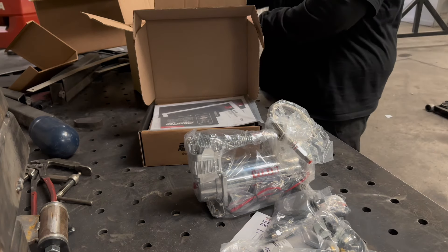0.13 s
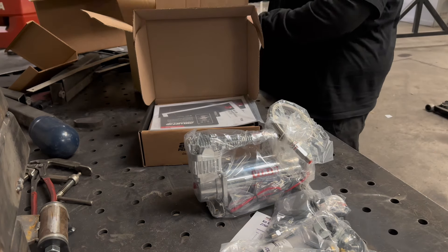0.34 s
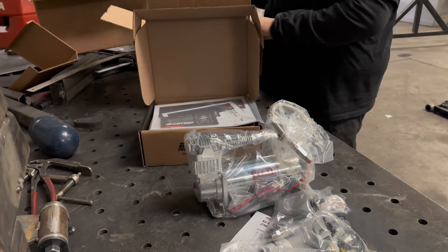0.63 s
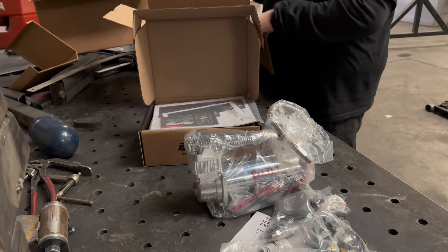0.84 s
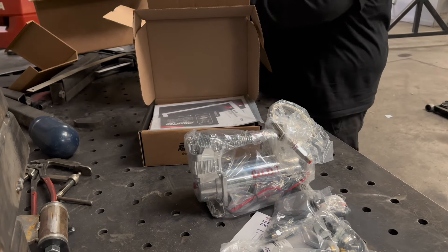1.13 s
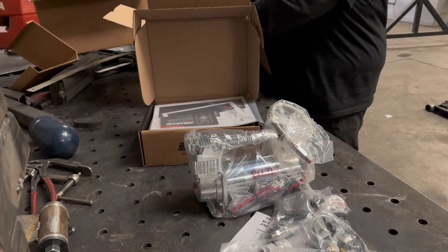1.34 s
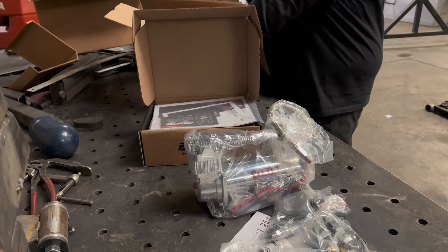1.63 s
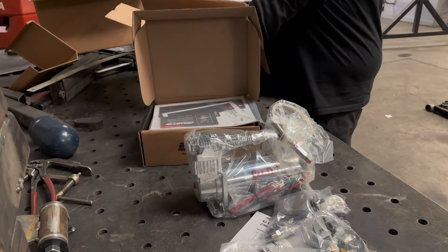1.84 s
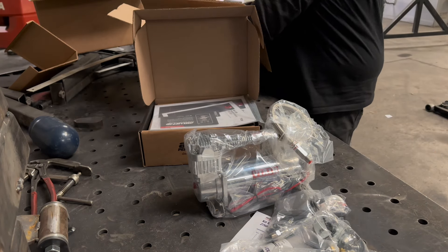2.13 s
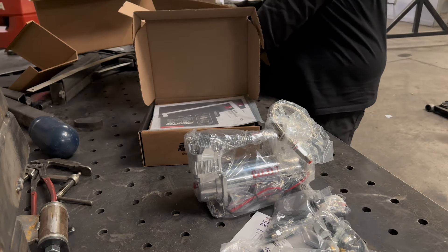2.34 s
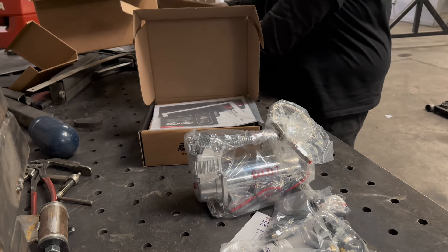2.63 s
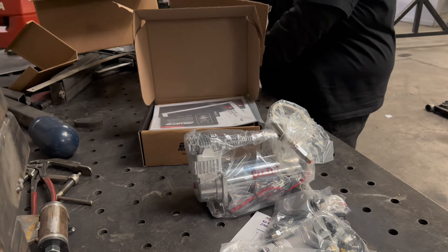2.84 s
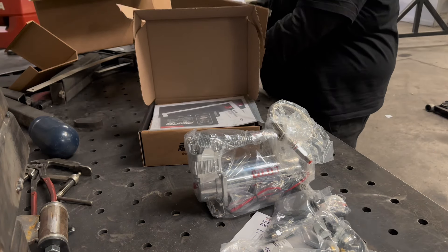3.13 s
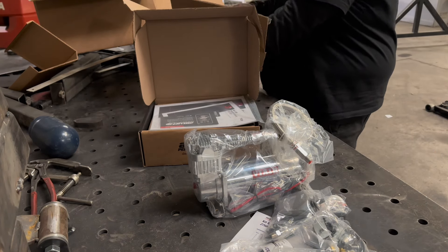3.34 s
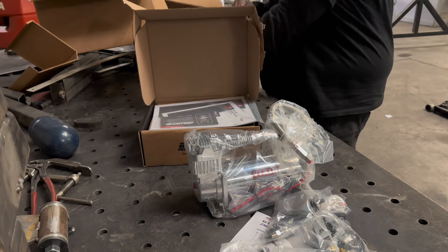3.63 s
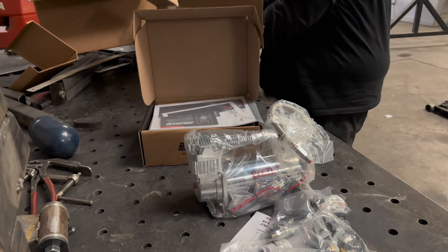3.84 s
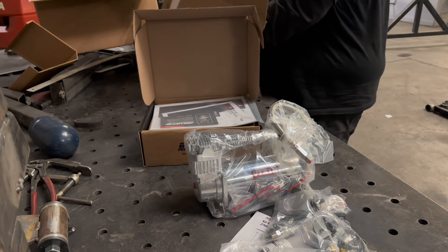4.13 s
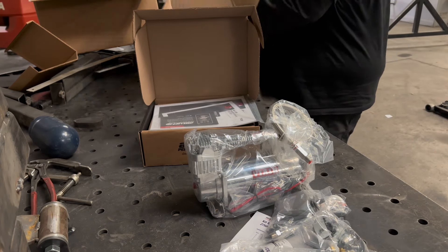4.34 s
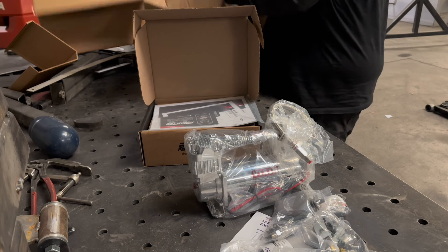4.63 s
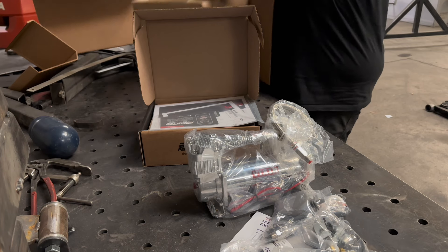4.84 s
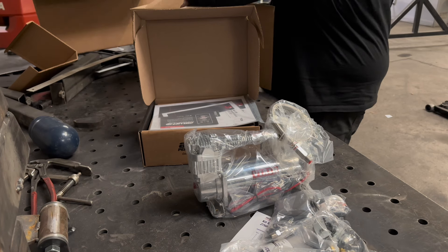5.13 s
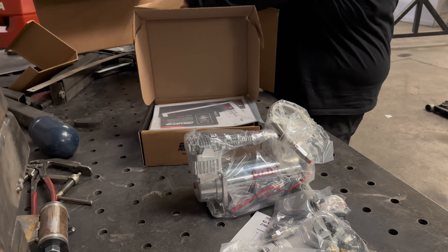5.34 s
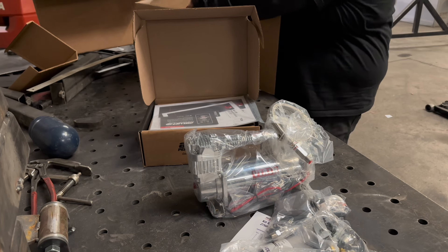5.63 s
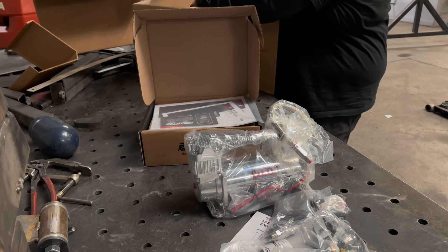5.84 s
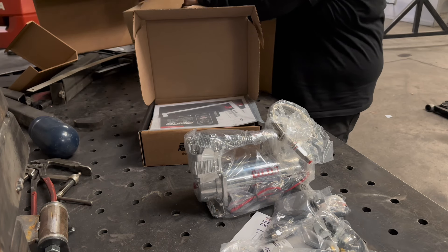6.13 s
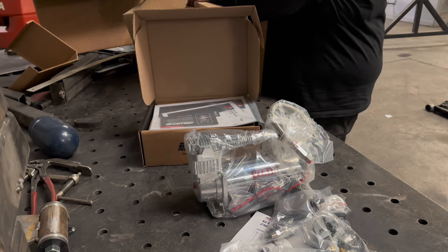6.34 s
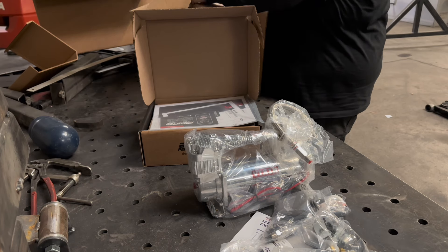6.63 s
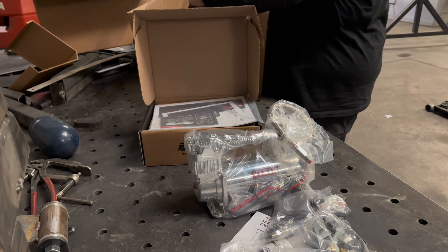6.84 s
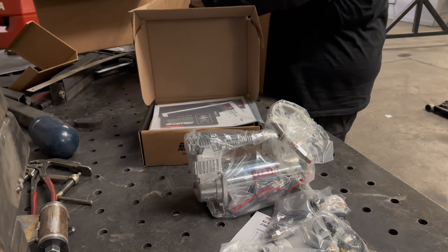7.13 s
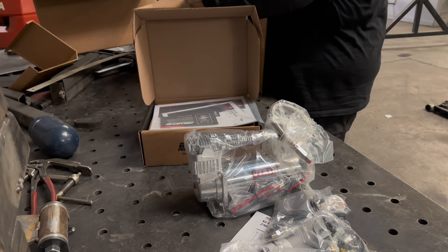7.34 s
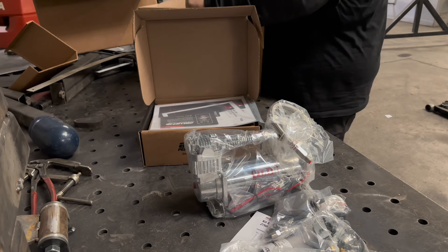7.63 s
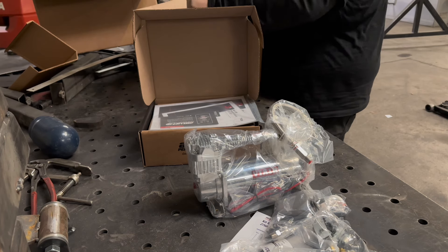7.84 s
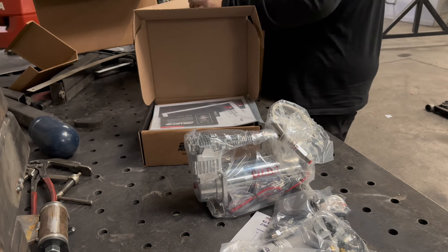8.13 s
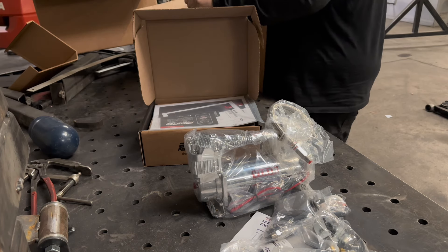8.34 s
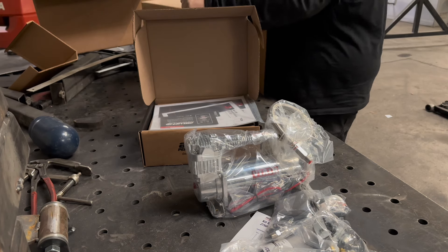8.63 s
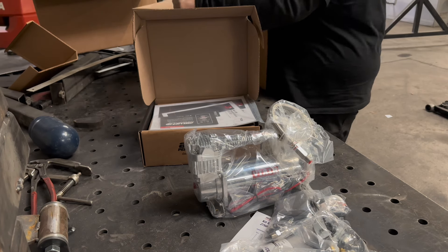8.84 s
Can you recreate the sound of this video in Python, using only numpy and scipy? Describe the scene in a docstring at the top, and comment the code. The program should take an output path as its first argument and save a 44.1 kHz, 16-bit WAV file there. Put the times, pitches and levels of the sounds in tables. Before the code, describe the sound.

Cardboard boxes and plastic bags handled on a workbench, with rustles, hollow knocks and crackles over a low workshop hum.

```python
"""Boxes and bags on a workbench

Cardboard boxes and plastic bags are handled on a steel bench in a large workshop. Knocks make the card
ring and its flaps slap, and whole boxes thud on the bench. Rubbing is a stream of tiny slips that makes
the card hiss, the hollow boxes ring low and the plastic fizz. Creases snap; edges chirp and whistle.
Two microphone ports a little apart hear it all, with the room's echo, rumble and mains hum beneath."""
import sys
import numpy as np
from scipy import signal
from scipy.fft import rfft, irfft, next_fast_len
from scipy.io import wavfile
from scipy.ndimage import uniform_filter1d

SR = 44100
rng = np.random.default_rng(int(sys.argv[2]) if len(sys.argv) > 2 else 0)


def unload_wav(signal):
    """Save mono or channel-first audio to the path in sys.argv[1] as 16-bit WAV at rate SR, clipped to [-1, 1]."""
    wavfile.write(
        sys.argv[1],
        SR,
        np.round(np.clip(np.atleast_2d(signal).T, -1, 1) * 32767).astype(np.int16),
    )


N = 396459

# Knocks on card. Slap and crack are added to level_db; a ring time is the time to fade by 60 dB.
# start_s, level_db, pitch_hz, ring_s, flap_pitch_hz, slap_db, crack_db
KNOCKS = [(0.05, -33.5, 166, 0.19, 1066, -0.5, -11), (0.222, -18, 440, 0.059, 910, -38, -21),
          (0.256, -22, 390, 0.057, 1290, -25, -9), (0.391, -27, 322, 0.058, 910, -17, -17),
          (0.439, -15.5, 466, 0.059, 1020, -10, -32), (0.679, -30, 465, 0.08, 1770, -9, -22),
          (1.183, -11.5, 335, 0.087, 540, -7, -29), (1.208, -11, 327, 0.059, 500, -2.5, -53),
          (1.221, -16, 530, 0.04, 259, 1.5, -51), (1.257, -11, 323, 0.062, 957, -0.5, -46),
          (1.279, -7.5, 410, 0.043, 842, -12, -35), (1.3217, -19.5, 442, 0.1, 968, 5.5, -30),
          (1.338, -30, 434, 0.17, 815, 10.5, -28), (1.365, -22, 433, 0.14, 816, -5, -30),
          (1.443, -32.5, 200, .2, 422, -5, -35), (1.601, -28.5, 181, 0.086, 926, -33, -20),
          (1.653, -32, 320, 0.1, 510, -7, -13.5), (1.726, -28.5, 295, 0.087, 487, -9, -29),
          (1.982, -34, 280, 0.092, 960, -10, -30), (2.278, -14, 221, 0.13, 735, -5.5, -16),
          (2.302, -26, 255, 0.025, 1690, -8, -27), (2.433, -21, 405, 0.064, 2010, -1, -4.5),
          (2.462, -3, 576, 0.031, 767, -19, -19), (2.485, -0.5, 525, 0.038, 1560, -11, -22),
          (2.51, -9.5, 184, 0.044, 665, -14, -26), (3.095, -30, 217, 0.16, 726, -19, -21),
          (3.361, -30, 462, 0.063, 1830, -8, -13), (3.769, -20.5, 331, 0.12, 1680, -9.5, -29),
          (3.775, -17, 237, 0.075, 770, -24, -33), (3.93, -29.5, 246, 0.083, 1010, -10, -27),
          (4.612, -22.5, 193, 0.28, 976, -13.5, -36), (4.729, -25, 232, 0.13, 1230, -27, -31),
          (4.771, -21, 219, 0.092, 970, -9.5, -35), (4.888, -9, 199.3, 0.13, 710, -16, -26),
          (4.956, -22.5, 255, 0.2, 710, -28, -40), (4.986, -19.5, 146, 0.08, 650, -5, -31),
          (5.265, -24.5, 348, 0.11, 797, -8, -35), (5.366, -21.5, 327, 0.25, 1050, -6, -39),
          (5.633, -35.5, 570, 0.067, 1014, 2, -3), (5.925, -7, 330, 0.042, 406, -5, -9.5),
          (5.935, -12, 426, 0.047, 1045, -8, -31), (5.949, -20, 322, 0.045, 880, -5, -35),
          (5.982, -16, 384, 0.093, 1247, -4, -8.5), (6.12, -16.5, 160, 0.062, 1720, -8, -13),
          (6.158, -19, 231, 0.1, 720, -22, -15), (6.185, -12, 218, 0.094, 877, -9, -14),
          (6.194, -14.5, 295, 0.049, 1050, -5.5, -18), (6.206, -10, 190, 0.061, 609, -9.5, -27),
          (6.224, -18, 265, 0.05, 977, -9, -14), (6.8036, -43, 210, 0.12, 1560, 10, -25),
          (7.009, -28, 212, 0.13, 780, -19, -54), (7.054, -33.5, 166, 0.1, 729, -44, -37),
          (7.228, -9, 299, 0.04, 388, -8, -16.5), (7.238, -10, 189, 0.056, 496, -16, -35),
          (7.25, -10, 368, 0.048, 977, -17, -25), (7.337, -9, 262, 0.059, 492, -14, -19.5),
          (7.58, -26, 208, 0.058, 970, -14, -12), (7.814, -28, 335, 0.045, 726, -6, -20),
          (7.82, -8, 250.9, 0.042, 735, -20, -27), (7.826, -7.5, 223, 0.078, 416, -16, -32),
          (7.839, -10.5, 241, 0.071, 410, -6.5, -26), (7.889, -24, 298, 0.047, 471, -1, -30),
          (8.243, -23.5, 406, 0.079, 1060, -12, -29), (8.347, -24.5, 236, 0.067, 1280, -26, -20),
          (8.552, -30.5, 155, 0.14, 1490, -9, -20), (8.869, -13.5, 364, 0.046, 640, -8.5, -25),
          (8.903, -26, 400, 0.055, 1110, -1, -20), (8.926, -22, 397, 0.075, 858, -5, -23)]
# The tones of a card panel, relative to the knock: pitch_ratio, gain_db, ring_ratio
PANEL_TONES = [(1.001, 2.5, 0.68), (1.5, -6.5, 0.6), (2.1, 0, 0.23), (3, -12, 0.54)]
# The tone colour of a knock's crack: frequency_hz, gain_db
CRACK_COLOUR = [(600, -11), (1200, -6.5), (3000, -7.5), (6000, -9), (10000, -9.5), (16000, -18.5)]


def knocks():
    """Each blow cracks, slaps a flap and sets a card panel ringing, a little left of centre."""
    t, out = np.arange(SR // 3) / SR, np.zeros((2, N))
    crackle = unit_level(colour(rng.standard_normal(N), CRACK_COLOUR))
    for start_s, level_db, pitch_hz, ring_s, flap_hz, slap_db, crack_db in KNOCKS:
        detunes = [1, *rng.uniform(0.92, 1.037, len(PANEL_TONES) - 1)]
        pan_db = 2 + 0.5 * rng.standard_normal()
        ring = sum(amp(db) * die_away(t, ring_s * ring_ratio) * sine(pitch_hz * ratio * detune, t)
                   for (ratio, db, ring_ratio), detune in zip(PANEL_TONES, detunes))
        ring *= fade_in(t, 0.0027) ** 2  # the bass takes a few ms to build
        neighbour_hz = flap_hz * rng.choice([.88, 1.12])  # a weaker tone roughens the slap
        slap_s = .07 / max(flap_hz / 800, 1) ** 1.6  # flaps above 800 Hz die faster
        slap = (sine(flap_hz, t) + .5 * sine(neighbour_hz, t)) * die_away(t, slap_s)
        crack = random_piece(crackle, len(t)) * (snap(t) + 0.35 * die_away(t, 0.41))
        attack = (amp(slap_db) * slap + amp(crack_db) * crack) * fade_in(t, 0.0006)
        knock = amp(level_db) * (ring + attack)
        right_lag_s = .00025 * rng.random()
        add(out[0], start_s, amp(pan_db / 2) * knock)
        add(out[1], start_s + right_lag_s, amp(-pan_db / 2) * knock)
    return out


# Boxes landing on the bench: start_s, level_db
BUMPS = [(0.254, -24), (1.207, -27), (1.725, -36), (1.779, -26), (4.728, -18.5), (4.77, -20.5), (4.889, -8),
         (5.984, -19.5), (6.161, -26), (6.204, -21), (7.229, -23), (7.58, -21), (7.823, -13), (8.87, -32)]
# The low tones of a whole box: pitch_hz, gain_db, ring_s
THUD_TONES = [(88, 4, 0.063), (131, 3, 0.079)]


def box_thuds():
    """A whole box bumps the bench and gives a short, deep thud."""
    t, out = np.arange(SR // 3) / SR, np.zeros(N)
    thud = sum(amp(db) * die_away(t, ring_s) * sine(hz, t) for hz, db, ring_s in THUD_TONES)
    thud *= fade_in(t, 0.0098)
    for start_s, level_db in BUMPS:
        add(out, start_s, amp(level_db) * thud)
    return out


# Strokes of hands and flaps over card and plastic. The last three levels are added to hiss_db.
# start_s, swell_s, hold_s, fade_s, hiss_db, body_db, flap_db, fizz_db
STROKES = [(0, 0.0013, 0.005, 0.075, -47.5, 15.5, -14, 10.5),
           (0.164, 0.024, 0.07, 0.13, -41.5, 1, -3, -0.5), (0.364, 0.091, 0.013, 0.078, -45.5, 9, 5, 5),
           (0.488, 0.082, 0.04, 0.076, -42, -4, -8, 1), (0.618, 0.047, 0.061, 0.036, -46, -1.5, -5, -5),
           (0.78, 0.089, 0.015, 0.053, -52, -21, -22, -2), (0.966, 0.042, 0.042, 0.03, -61, -14, -11, 3),
           (1.183, 0.0022, 0.14, 0.21, -54.5, 25, 10.5, 5), (1.325, 0.0087, 0.023, .1, -51.5, -1, 16.5, -7),
           (1.34, 0.096, 0.093, 0.34, -60, 15, 12, 16), (1.66, 0.048, 0.079, .2, -51, 3, 0, 0.5),
           (1.863, 0.26, 0.17, 0.15, -47.5, 3.5, 2, 2), (2.252, 0.054, 0.01, 0.034, -30, 4.5, 6.5, 2.5),
           (2.321, 0.02, 0.026, 0.036, -32.5, -13, 1.5, -3),
           (2.418, 0.062, 0.012, 0.019, -23.5, -3.5, 6.5, -8),
           (2.514, 0.14, 0.11, 0.096, -44.5, 4, 5.5, -0.5), (2.878, 0.27, 0.05, 0.1, -58.5, 14.5, 5, -3),
           (3.228, 0.002, 0.23, 0.23, -51.5, 3, 1, -8), (3.522, 0.084, 0.21, 0.24, -56.5, 11.5, 9, 5),
           (3.822, 0.12, 0.017, 0.1, -45, 6, 5.5, -1), (4.123, 0.036, 0.19, 0.18, -46, 2, -5, -3),
           (4.464, 0.055, 0.13, 0.059, -47.5, 3, -3, 1.5), (4.634, 0.028, 0.025, .06, -44, 7, -15, 0),
           (4.676, 0.045, 0.044, 0.25, -50, 18, 4.5, 3), (4.88, 0.0028, 0.034, 0.18, -47, 19.5, 6, 4),
           (5.149, 0.11, 0.1, 0.41, -51.5, 10.5, 2.5, 2.5), (5.477, 0.15, 0.29, 0.16, -50, 4.5, -1.5, 7),
           (5.917, 0.0054, 0.0071, 0.026, -22, 5, -2.5, -6), (5.961, 0.034, 0.017, 0.029, -31.5, 7, 3, -16),
           (6.083, 0.029, 0.025, .04, -37, 2, 0, -3), (6.139, 0.019, 0.016, 0.026, -35, 7, 2, 0),
           (6.175, 0.0092, 0.03, 0.032, -33.5, 9.5, 6.5, -11), (6.262, 0.065, 0.039, 0.51, -52, 9.5, 3, 1),
           (6.445, 0.085, 0.065, 0.22, -48.5, 1.5, 0, 3.5), (6.748, 0.029, 0.074, 0.22, -63.5, 7, 10, 3),
           (7.157, 0.041, .03, .03, -54, 8, 6, -2), (7.222, 0.0027, 0.11, 0.14, -39, 9, 3, -1.5),
           (7.46, 0.12, 0.055, 0.16, -36, 7, 0, 2.5), (7.808, 0.016, 0.046, 0.14, -44, 20.5, 15.5, -18),
           (7.94, 0.062, 0.055, 0.19, -53.5, 12, 11, -7.5),
           (8.204, 0.049, 0.014, 0.053, -53.5, 15.5, 11, 0), (8.304, 0.056, 0.015, 0.036, -42, 8, -8, -15),
           (8.35, 0.098, 0.15, 0.29, -47, 3.5, 0, -3.5), (8.7, 0.028, 0.087, 0.23, -46.5, 10, -1, 2),
           (8.828, 0.084, 0.035, 0.027, -39.5, 10.5, 4, -7)]
# Faint handling that never stops, with levels given the same way: hiss_db, body_db, flap_db, fizz_db
FAINT_HANDLING = (-79, 22.5, 8, -23)


def stroke_levels():
    """Each stroke swells, holds and fades. Gives the loudness of hiss, body, flap and fizz over time."""
    t = np.arange(0, N / SR + .002, .001)
    start_s, swell_s, hold_s, fade_s, hiss_db, *parts_db = np.transpose(STROKES)[:, :, None]
    knock_s = np.transpose(KNOCKS)[0]
    nearest_s = knock_s[abs(knock_s - start_s).argmin(axis=1)][:, None]
    # A stroke that a knock sets off starts with that knock.
    start_s = np.where(abs(nearest_s - start_s) < .015, nearest_s, start_s)
    peak_s = start_s + np.maximum(swell_s, .002)
    rising_db = 18 * (t - peak_s) / (peak_s - start_s)
    falling_db = 20 * (peak_s + hold_s - t) / np.maximum(fade_s, .02)
    stroke_db = hiss_db + np.minimum(0, np.minimum(rising_db, falling_db))
    levels = []
    for part_db, faint_db in zip([0, *parts_db], [0, *FAINT_HANDLING[1:]]):
        power = (amp(stroke_db + part_db) ** 2 * (t >= start_s)).sum(axis=0)
        power += amp(FAINT_HANDLING[0] + faint_db) ** 2
        levels.append(np.interp(np.arange(N) / SR, t, np.sqrt(power)))
    return levels


# The tone colours of rubbed card and of rubbed plastic: frequency_hz, gain_db
HISS_COLOUR = [(900, -91.5), (1800, 1.5), (3000, -2), (5000, 3.5), (7000, -3)]
FIZZ_COLOUR = [(3500, 10.5), (6000, -1.5), (9000, 12.5), (12500, 4), (16000, 3.5)]
# Where the hollow box and its loose flaps ring: pitch_hz, width_hz, gain_db
BOX_TONES = [(105.3, 112, 2.5), (194, 135, 1), (290, 145, -1), (381, 145, -2.5), (566, 1200, -17)]
FLAP_TONES = [(632, 120, 1), (953, 430, -3), (1280, 100, -4), (1650, 620, -4.5)]


def rubbing():
    """Tiny slips make the card hiss, the plastic fizz, and the flaps and hollow box ring."""
    hiss_level, body_level, flap_level, fizz_level = stroke_levels()
    card_slips = slips(per_s=6000, spread_db=3.16, clump_db=3.5)
    plastic_slips = slips(per_s=12000, spread_db=3.0, clump_db=0.83)
    nudges = slips(per_s=1500, spread_db=2.4, clump_db=2.8)
    hiss = hiss_level * unit_level(colour(card_slips, HISS_COLOUR))
    fizz = fizz_level * unit_level(colour(plastic_slips, FIZZ_COLOUR))
    flaps = flap_level * unit_level(resonate(card_slips, FLAP_TONES))
    body = body_level * unit_level(resonate(resonate(nudges, BOX_TONES), BOX_TONES))
    return hiss, fizz, flaps + body


# Creases snapping: start_s, card_click_db, plastic_tick_db
CREASES = [(0.1959, -34.5, -28), (0.257, -50, -31), (.273, -37.5, -28), (0.4384, -35, -47),
           (0.5253, -52, -25), (0.797, -64, -50), (1.072, -61, -49), (1.1823, -46, -37), (1.2045, -43, -54),
           (1.257, -34.5, -52), (1.324, -40, -52), (1.978, -44.5, -49), (2.2769, -21, -33),
           (2.306, -18, -20), (2.342, -30, -33), (2.434, -35, -32), (2.462, -29, -32), (2.4918, -14, -17),
           (2.513, -31, -42), (2.909, -51, -28), (3.236, -54, -36), (3.285, -56, -40), (3.3111, -40, -37),
           (3.36, -40.5, -54), (3.655, -42, -38), (3.677, -40, -41), (3.7764, -42, -56), (3.932, -48, -54),
           (3.961, -34, -37), (4.015, -45, -45), (4.185, -49, -28), (4.2205, -55, -30), (4.2466, -42, -30),
           (4.524, -59, -36), (4.741, -43, -34), (4.7714, -38, -34), (4.887, -32, -28), (4.985, -45, -48),
           (5.177, -60, -41), (5.2637, -49, -31), (5.369, -39, -38), (5.6344, -49, -39), (5.924, -31, -8.5),
           (6.12, -38, -37), (6.1532, -38, -32), (6.1842, -36, -27), (6.205, -27, -24), (6.5843, -42, -34),
           (6.8028, -36.5, -55), (6.842, -53, -38), (7.227, -26, -14.5), (7.248, -26, -24),
           (7.3353, -21, -23), (7.818, -36, -50), (7.829, -31, -50), (7.918, -30, -50), (7.929, -33, -53),
           (8.181, -58, -40), (8.242, -36.5, -55), (8.3571, -34, -53), (8.731, -40.5, -37),
           (8.7923, -51, -30), (8.864, -38.5, -32), (8.925, -27, -42)]
# The tone colours of a card click and of a plastic tick: frequency_hz, gain_db
CLICK_COLOUR = [(500, -5.5), (1200, 4), (2500, -1), (4500, -9), (7000, -24.5)]
TICK_COLOUR = [(3000, -12.5), (6000, -10.5), (9000, -6.5), (15000, -8)]


def creases():
    """A crease gives way: a few milliseconds of card click and a plastic tick half as long."""
    t, out = np.arange(SR // 20) / SR, np.zeros((2, N))  # one row of clicks, one of ticks
    noises = np.array([unit_level(colour(rng.standard_normal(N), shape))
                       for shape in (CLICK_COLOUR, TICK_COLOUR)])
    bursts = np.array([snap(t), snap(2 * t)])
    for start_s, click_db, tick_db in CREASES:
        add(out, start_s, amp([[click_db], [tick_db]]) * bursts * random_piece(noises, len(t)))
    return out


# Edges catching: start_s, pitch_hz, level_db, swell_s
CATCHES = [(1.203, 1940, -35, 0.0025), (1.322, 1330, -22, 0.0028), (1.323, 2090, -38, .002),
           (5.365, 1950, -35, 0.0033), (1.323, 4500, -37, 0.0014), (1.333, 4380, -39, .0015),
           (4.658, 2690, -40, 0.017), (4.67, 3830, -42, 0.007), (4.679, 3000, -44, 0.0058),
           (4.694, 1900, -40, 0.0024), (4.771, 1870, -33, 0.0021), (4.775, 5740, -36.5, 0.0015),
           (5.9242, 2625, -12, 0.0019), (5.938, 2760, -21, .003), (5.9255, 5400, -29, 0.0019),
           (5.951, 2610, -26, 0.0033), (6.154, 2900, -31, 0.0031), (6.186, 2720, -28, 0.0016),
           (6.194, 2800, -27, 0.0018), (6.204, 4000, -29, 0.0018), (6.204, 5400, -24, 0.0018),
           (6.518, 3050, -42, 0.006), (6.52, 995, -39.5, 0.0063), (6.8022, 2470, -34, 0.00088),
           (7.263, 1750, -35, .003), (7.31, 1500, -38, .002), (7.35, 1660, -39, 0.0024),
           (7.882, 1470, -31, .003), (1.1825, 5500, -37, 0.001), (2.305, 1650, -15.5, 0.0024),
           (2.367, 1500, -25, .003), (2.486, 6160, -28, .002), (3.236, 3900, -39.5, .002),
           (3.254, 4800, -45, .002), (3.774, 1670, -30.5, 0.0028), (3.953, 2600, -36, .002),
           (6.803, 1710, -35.5, .002), (2.343, 2130, -28, .003), (8.862, 2670, -42, .002),
           (8.924, 3250, -36, 0.0023), (8.949, 1470, -32, .003), (8.243, 2020, -43, .002)]


def edge_chirps():
    """An edge catches and lets go with a short, rough chirp of nine close tones."""
    t, out = np.arange(SR // 20) / SR, np.zeros(N)
    for start_s, pitch_hz, level_db, swell_s in CATCHES:
        scatter, phase = rng.random((2, 9, 1))
        tones_hz = pitch_hz * (1 + .09 * (2 * scatter - 1))  # within 9% of the pitch
        tones = np.sin(2 * np.pi * (tones_hz * t + phase)).sum(axis=0)
        chirp = snap(t, max(swell_s, .001)) * tones
        add(out, start_s, amp(level_db) * chirp / abs(chirp).max())
    return out


# How loud the sliding flap is over time: time_s, level_db
SLIDE_LEVELS = [(5.3, -61), (5.55, -50), (5.62, -49), (5.7, -46), (5.8, -41.5), (5.86, -66)]
# The tones of its whistle: pitch_hz, width_hz, gain_db
WHISTLE_TONES = [(980, 150, 6.5), (1806, 150, 9), (2530, 240, 7.5)]


def flap_whistle():
    """A flap edge slides, and its fine friction noise whistles in three narrow tones."""
    time_s, level_db = np.transpose(SLIDE_LEVELS)
    friction = slips(per_s=3000, spread_db=3.5, clump_db=1.0)
    whistle = unit_level(resonate(resonate(friction, WHISTLE_TONES), WHISTLE_TONES))
    return amp(np.interp(np.arange(N) / SR, time_s, level_db, left=-200, right=-200)) * whistle


# How long the room rings, from bass to treble: frequency_hz, ring_s
ROOM_RING = [(100, 0.58), (500, 0.22), (2000, 0.32), (8000, 0.37)]


def echo_tail():
    """The room's answer to one click: scattered reflections, each band dying at its own speed."""
    reflections = np.zeros((2, SR // 2))
    slots = np.arange(160, SR // 2 - 20, 20)
    arrivals = slots + rng.integers(0, 20, (2, len(slots)))
    np.put_along_axis(reflections, arrivals, rng.choice([-1., 1.], arrivals.shape), 1)
    hz, t, bands = signal.stft(reflections, SR, nperseg=256)
    bands *= die_away(t, read_curve(ROOM_RING, hz)[:, None])
    echo = signal.istft(bands, SR, nperseg=256)[1]
    echo *= fade_in(np.arange(echo.shape[1]) / SR, 0.0015)  # far walls answer late
    return echo / np.linalg.norm(echo[0])


def room_echo(sound, tails=3, drift_hz=1.3):
    """Hands and boxes keep moving, so the echo drifts between a few different tails."""
    turn = 2 * np.pi * drift_hz * np.arange(N) / SR
    shares = (sound * np.cos(turn + np.pi * k / tails) for k in range(tails))
    echo = sum(signal.fftconvolve(share, echo_tail(), axes=1)[:, :N] for share in shares)
    return echo * np.sqrt(2 / tails)


# The tone colour of the room's rumble: frequency_hz, gain_db
RUMBLE_COLOUR = [(18, -67), (32, -8), (60, 6), (100, 1.5), (167, -10.5), (455, -17), (835, -22),
                 (1700, -25.5), (3000, -32.5), (6000, -35.5), (16000, -53)]


def room_rumble():
    """Broad, low noise: each port hears its own blend of the same two noises."""
    shared, side = rng.standard_normal((2, N))
    return unit_level(colour(np.array([shared + 1.17 * side, shared - 0.79 * side]), RUMBLE_COLOUR))


def mains_hum(pitch_hz=120.6, waver_db=2.0):
    """Mains power hums on one low, slightly wavering tone."""
    waver = wobble(3000)
    phase = 2 * np.pi * pitch_hz * np.arange(N) / SR + 0.13 * waver
    return np.sqrt(2) * np.sin(phase) * amp(waver_db * waver)


def slips(per_s, spread_db, clump_db):
    """Friction as tiny slips of uneven size that come in clumps of about 10 ms."""
    sizes = amp(spread_db * np.minimum(rng.exponential(1, N), 4.2)) * rng.choice([-1., 1.], N)
    clumps = amp(clump_db * np.clip(wobble(400), -2, 2))
    return sizes * (rng.random(N) < per_s / SR) * clumps


def wobble(samples):
    """A smooth random curve; more samples make it slower."""
    return unit_level(uniform_filter1d(uniform_filter1d(rng.standard_normal(N), samples), samples))


def snap(t, swell_s=.0017):
    """A quick swell to 1, then a quick fall."""
    return t / swell_s * np.exp(1 - t / swell_s)


def fade_in(t, rise_s):
    return 1 - np.exp(-t / rise_s)


def die_away(t, ring_s):
    return amp(-60 * t / ring_s)


def sine(hz, t):
    return np.sin(2 * np.pi * hz * t)


def amp(db):
    return 10 ** (np.asarray(db) / 20)


def unit_level(sound):
    return sound / np.sqrt(np.mean(sound ** 2) + 1e-20)


def random_piece(noise, samples):
    return noise[..., rng.integers(N - samples):][..., :samples]


def add(mix, start_s, sound):
    part = mix[..., round(start_s * SR):][..., :sound.shape[-1]]
    part += sound[..., :part.shape[-1]]


def read_curve(points, hz):
    points_hz, values = np.transpose(points)
    return np.interp(np.log(hz + 1), np.log(points_hz + 1), values)


def colour(sound, curve):
    """Turns each frequency up or down by the curve's decibels."""
    size = next_fast_len(N)
    gain = amp(read_curve(curve, np.fft.rfftfreq(size, 1 / SR)))
    return irfft(rfft(sound, size) * gain, size)[..., :N]


def resonate(sound, tones):
    """Makes a sound ring at the given tones. Used twice, it narrows them and doubles each gain_db."""
    return sum(amp(db) * signal.lfilter(*signal.iirpeak(hz, hz / width_hz, SR), sound)
               for hz, width_hz, db in tones)


def to_ports(sound, lag_samples):
    """Sound from the left reaches the right port a little later."""
    left, right = sound * np.ones((2, 1))
    return np.array([left, np.concatenate([np.zeros(lag_samples), right])[:N]])


def scene():
    """Knocks, rubbing and snaps at the bench, over the room's echo, rumble and hum."""
    hiss, fizz, box_ring = rubbing()
    clicks, ticks = creases()
    rubs = to_ports(hiss, lag_samples=22) * amp([[.5], [-.5]])
    rubs += to_ports(fizz, lag_samples=7) + to_ports(box_ring + flap_whistle(), lag_samples=5)
    blows = to_ports(knocks() + box_thuds(), lag_samples=1)
    snaps = to_ports(ticks, lag_samples=5) + to_ports(clicks + edge_chirps(), lag_samples=1)
    direct = amp(1.0) * blows + amp(-1.0) * rubs + amp(0.5) * snaps
    echo = room_echo(rubs + amp(-2.5) * blows + amp(-4.5) * snaps)  # near sounds get less echo
    return direct + amp(-2.0) * echo + amp(-44.5) * room_rumble() + amp(-51.5) * mains_hum()


# How left plus right, and left minus right, are coloured: frequency_hz, gain_db. Left plus right has a deep
# hole between about 10.4 and 12.2 kHz.
MIDDLE_COLOUR = [(10000, 0), (10350, -6), (10600, -30), (11700, -26.5), (12200, -12.5), (12700, -1.5)]
SIDE_COLOUR = [(30, -33), (125, -10), (250, -9), (500, 1), (1000, 3.5), (2500, -1.5), (12300, -2),
               (13300, -20)]


def record(dry, low_cut_hz=53.5, high_cut_hz=15850):
    """Left plus right and left minus right are coloured; then the deepest bass and highest treble are cut."""
    middle = colour(dry[0] + dry[1], MIDDLE_COLOUR) / 2
    side = colour(dry[0] - dry[1], SIDE_COLOUR) / 2
    pair = np.array([middle + side, middle - side])
    low_cut = signal.butter(2, low_cut_hz, "high", fs=SR, output="sos")
    high_cut = signal.firwin(511, high_cut_hz, window=("kaiser", 9), fs=SR)
    return signal.oaconvolve(signal.sosfilt(low_cut, pair), high_cut[None], "same")


dry = scene()
out = record(dry)
unload_wav(out)
```